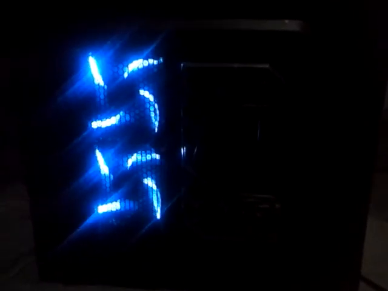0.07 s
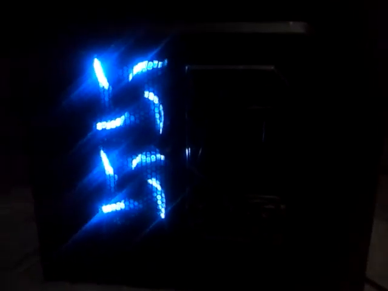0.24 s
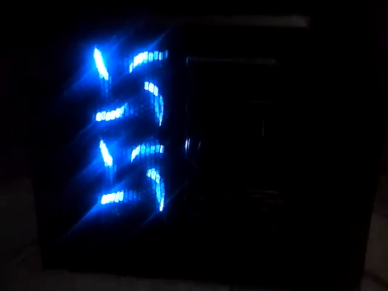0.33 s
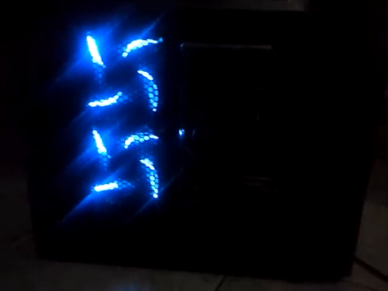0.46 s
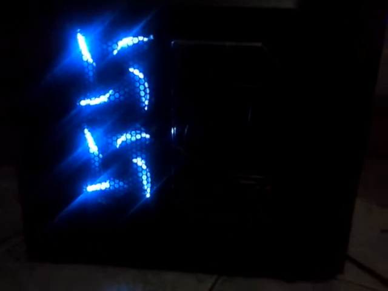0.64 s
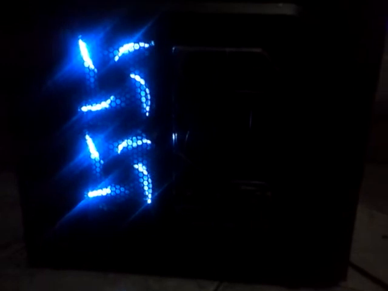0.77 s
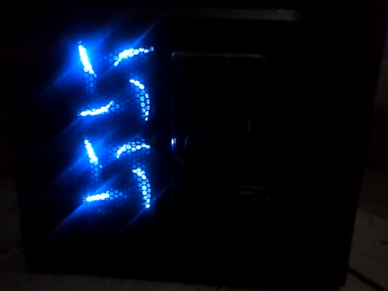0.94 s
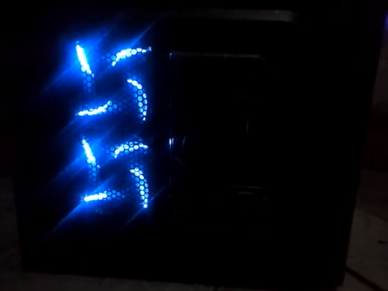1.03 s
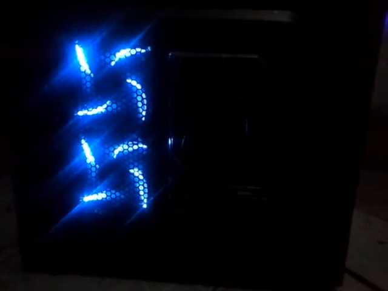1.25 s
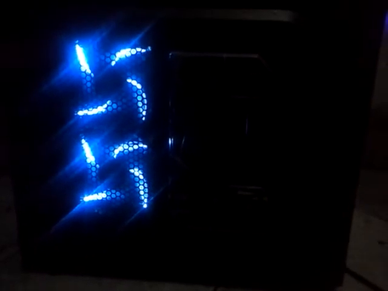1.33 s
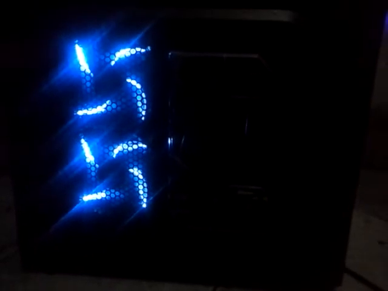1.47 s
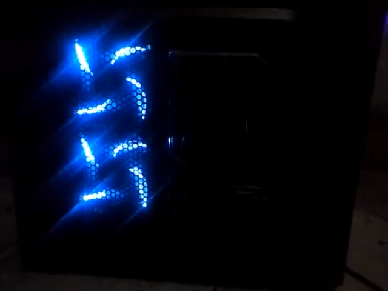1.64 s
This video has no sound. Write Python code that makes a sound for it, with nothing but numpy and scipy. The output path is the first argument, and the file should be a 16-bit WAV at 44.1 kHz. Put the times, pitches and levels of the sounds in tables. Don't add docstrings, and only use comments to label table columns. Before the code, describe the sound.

Continuous computer fan noise, quiet and slightly dull, picked up close by a handheld microphone with limited treble. A light handling click comes almost at once, a much louder sharp click follows, then only even whirring.

```python
import sys
import numpy as np
from scipy import signal
from scipy.io import wavfile
from scipy.ndimage import uniform_filter1d

SR = 44100
rng = np.random.default_rng(int(sys.argv[2]) if len(sys.argv) > 2 else 0)


def boost(x):
    u = np.asarray(x, float) / 20
    return 10 ** u


def inscribe(sig):
    pcm = np.round(np.clip(np.atleast_2d(sig).T, -1, 1) * 32767)
    wavfile.write(sys.argv[1], SR, pcm.astype(np.int16))


N = 74970


def evened(x):
    return x / np.sqrt(np.mean(x ** 2) + 1e-20)


def curve(points, t):
    return np.interp(t, *np.transpose(points))


def drift(t, top_hz):
    total = 0
    for hz in np.linspace(.5, top_hz, 24):
        total = total + np.sin(2 * np.pi * (hz * t + rng.random())) / hz ** .25
    return evened(total)


# pitch_hz, level_db (per Hz)
AIR_COLOUR = [(25, -20), (70, -11), (250, -5), (700, -6.5), (1500, -11), (2500, -16), (4500, -23),
              (7400, -30)]
# time_s, level_db
AIR_LEVEL = [(0, -53), (.2, -52.5), (.3, -51), (.55, -51), (.75, -52.5), (1.2, -52.5), (1.7, -53)]


def air_wash():
    patchy_db, swell_db, flicker_db = .8, .2, .6
    window, hop = 1024, 256
    frames = N // hop + 5
    hz = np.fft.rfftfreq(window, 1 / SR)
    real, imag, patches = rng.standard_normal((frames, len(hz), 3)).T
    patches = uniform_filter1d(patches, size=10, axis=0)
    patches = evened(uniform_filter1d(patches, size=10, axis=1))
    t = np.arange(frames) * hop / SR
    colour_hz, colour_db = np.transpose(AIR_COLOUR)
    colour = np.interp(np.log(hz + 1), np.log(colour_hz + 1), colour_db)
    level_db = colour[:, None] + patchy_db * patches + swell_db * drift(t, 3)
    level_db = level_db + flicker_db * rng.standard_normal(frames)
    spectra = (real + 1j * imag) * boost(level_db)
    noise = signal.istft(spectra, nperseg=window, noverlap=window - hop)[1][:N]
    return evened(noise) * boost(curve(AIR_LEVEL, np.arange(N) / SR))


def blade_tones(rate_hz, orders):
    waver_db, waver_hz, jitter = 1.1, 12, .0003
    t = np.arange(N) / SR
    turns = np.cumsum(rate_hz * (1 + jitter * drift(t, 6))) / SR
    total = np.zeros(N)
    for multiple, level_db in orders:
        level = np.sqrt(2) * boost(level_db + waver_db * drift(t, waver_hz))
        total += level * np.sin(2 * np.pi * (round(multiple) * turns + rng.random()))
    return total


# blade_rate_multiple, level_db (rms)
FRONT_TONES = [(1, -68), (3, -64), (4, -63.5), (5, -70), (6, -68.5), (8, -78), (9, -74)]


def front_fan():
    blade_rate_hz = 234.5
    return blade_tones(blade_rate_hz, FRONT_TONES)


# time_s, blade_rate_hz
INNER_SPEED = [(0, 452.2), (.75, 452.6), (.95, 454.0), (1.7, 454.9)]
# blade_rate_multiple, level_db (rms)
INNER_TONES = [(1, -73), (2, -56.5), (4, -67.5), (5, -82)]


def inner_fan():
    return blade_tones(curve(INNER_SPEED, np.arange(N) / SR), INNER_TONES)


# start_s, level_db, pitch_hz, decay_s (to -60 dB), push_sign
FIRST_SHIFT = [
    (.0905, -27, 600, .004, 1),
    (.0912, -21, 520, .005, -1),
    (.0926, -37, 5500, .002, 1),
    (.0932, -36, 150, .02, 1),
    (.0950, -28, 3000, .002, 1),
    (.09596, -22, 2400, .003, 1),
    (.0964, -23, 2300, .002, 1),
    (.09603, -28, 4700, .0025, 1),
    (.0966, -27, 2600, .001, -1),
    (.1184, -34, 600, .004, -1),
]
# start_s, level_db, pitch_hz, decay_s (to -60 dB), push_sign
SECOND_SHIFT = [(.2116, -27, 2500, .0012, -1), (.2118, -30, 1000, .005, 1), (.2190, -38, 2500, .002, 1),
                (.2247, -32, 1200, .006, -1), (.2270, -37, 900, .005, 1), (.23065, -13, 1800, .0012, -1),
                (.2309, -24, 1100, .002, 1), (.23133, 4.3, 1800, .0011, -1), (.23152, -9, 1300, .002, -1),
                (.2318, -16, 2900, .0015, 1), (.2318, -2.5, 820, .0035, 1), (.23185, -10.5, 440, .010, 1),
                (.2344, -27, 900, .008, 1)]


def fingers():
    rise_s = .00005
    t = np.arange(N) / SR
    out = np.zeros(N)
    for start_s, level_db, pitch_hz, decay_s, push in FIRST_SHIFT + SECOND_SHIFT:
        since = np.maximum(t - start_s, 0)
        level = boost(level_db - 60 * np.minimum(since / decay_s, 4))
        onset = 1 - np.exp(-since / rise_s)
        out += np.sign(push) * level * onset * np.sin(2 * np.pi * pitch_hz * since)
    first = t < SECOND_SHIFT[0][0]
    bass_cut = signal.butter(2, 150, "high", fs=SR)
    return out * first + signal.lfilter(*bass_cut, out * ~first)


# pitch_hz, level_db (rms), growth_share
PANELS = [(52.4, -71, .9), (72.8, -68, .9), (155.8, -69, .2), (203, -72, -.5)]
# time_s, growth_db
HUM_GROWTH = [(0, -2), (.3, -5), (.55, -2), (.85, -9), (1.1, 0), (1.4, 3), (1.7, 2)]


def panel_hum():
    t = np.arange(N) / SR
    growth_db = curve(HUM_GROWTH, t)
    total = np.zeros(N)
    for pitch_hz, level_db, share in PANELS:
        level = np.sqrt(2) * boost(level_db + share * growth_db + 1.5 * drift(t, 5))
        total += level * np.sin(2 * np.pi * (pitch_hz * t + rng.random()))
    return total


def scene():
    return (air_wash() + front_fan() + inner_fan() + fingers() + panel_hum())[None]


def roll_off(x):
    return signal.sosfilt(signal.butter(12, 8840, fs=SR, output="sos"), x)


def record(dry):
    edge_hz = [0, 6900, 7550, 7950, 8450, 8800, SR / 2]
    edge_db = np.array([0, -.1, -14, -42, -25, -32, -90])
    band_limit = signal.firwin2(401, edge_hz, boost(edge_db), fs=SR)
    mix = signal.oaconvolve(dry, band_limit[None], "same")
    return roll_off(mix)


dry = scene()
out = record(dry)
inscribe(out)
```